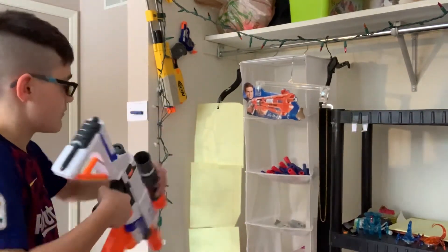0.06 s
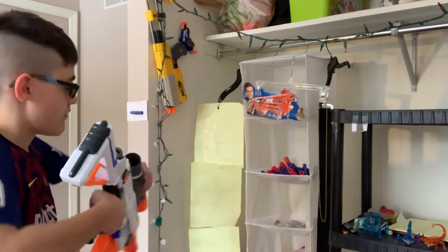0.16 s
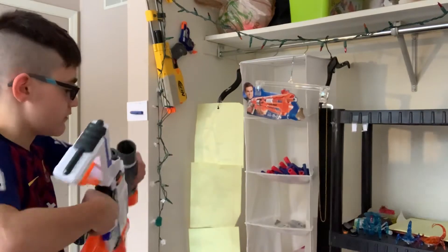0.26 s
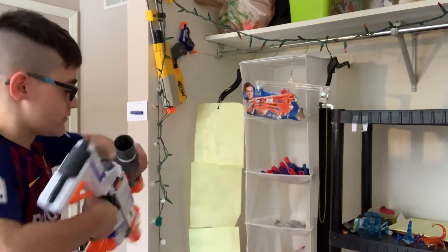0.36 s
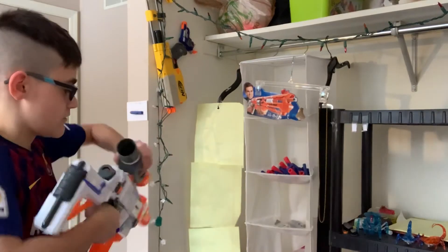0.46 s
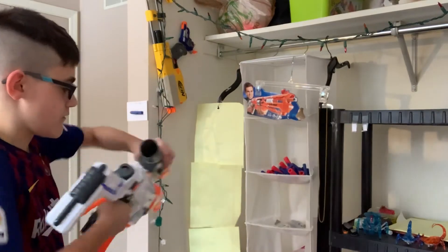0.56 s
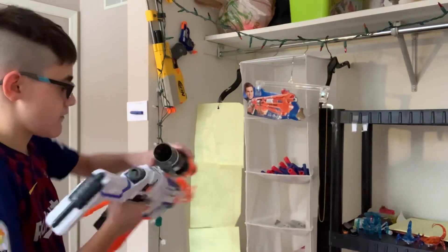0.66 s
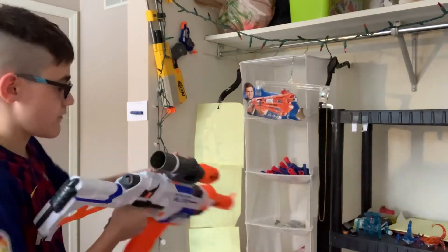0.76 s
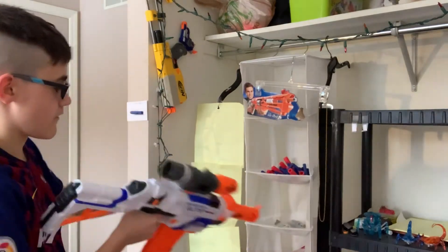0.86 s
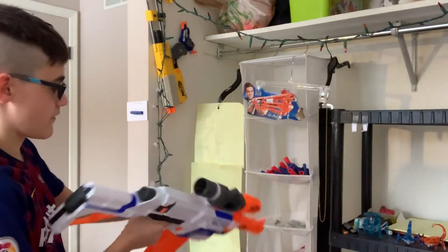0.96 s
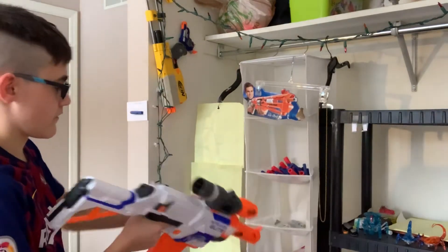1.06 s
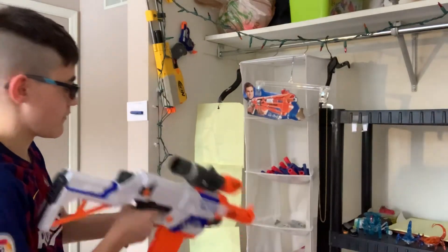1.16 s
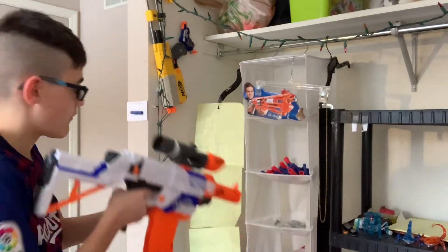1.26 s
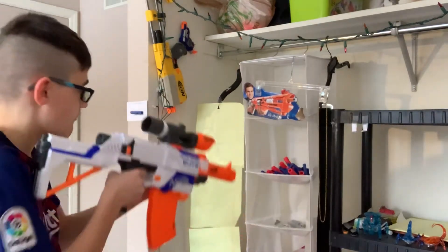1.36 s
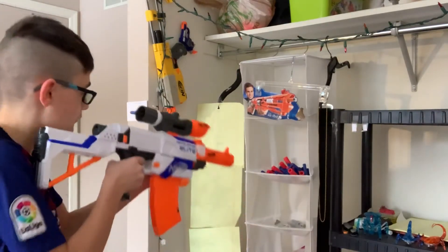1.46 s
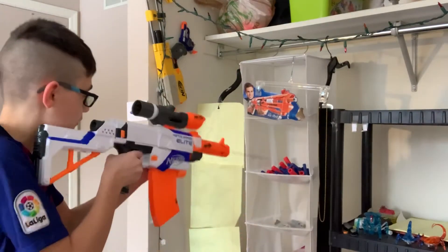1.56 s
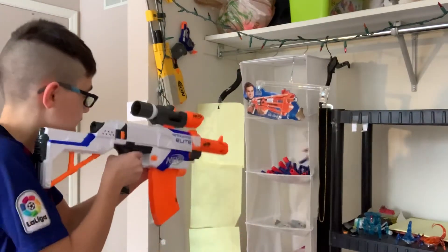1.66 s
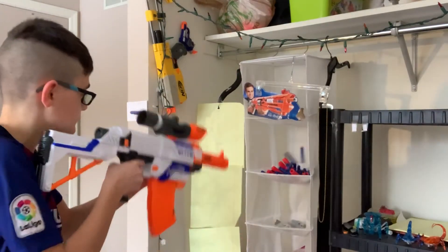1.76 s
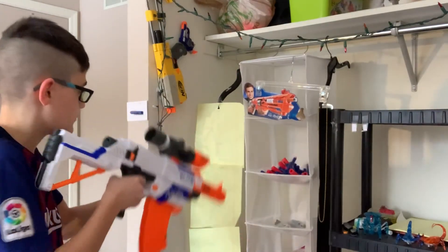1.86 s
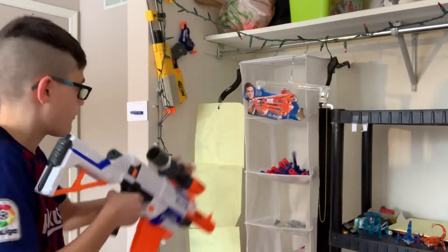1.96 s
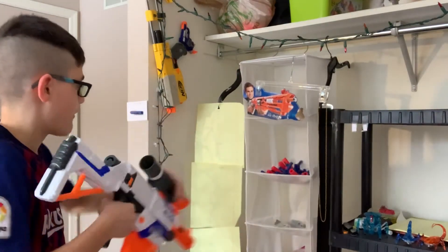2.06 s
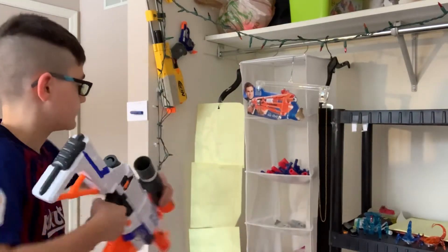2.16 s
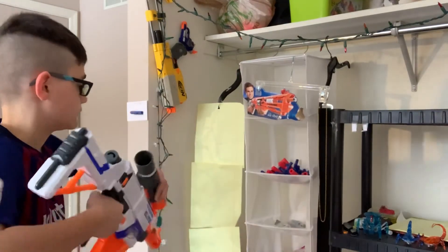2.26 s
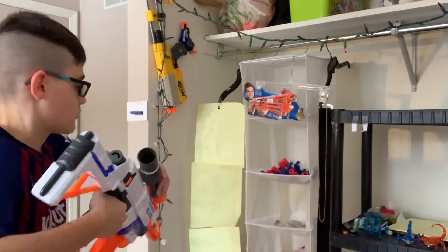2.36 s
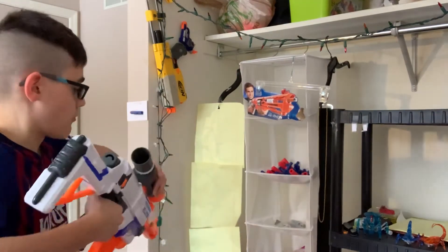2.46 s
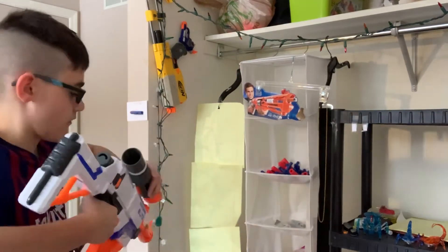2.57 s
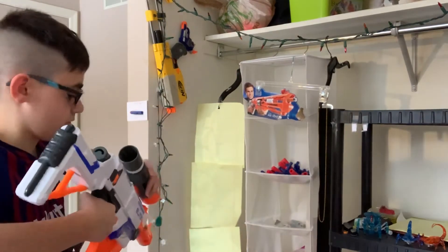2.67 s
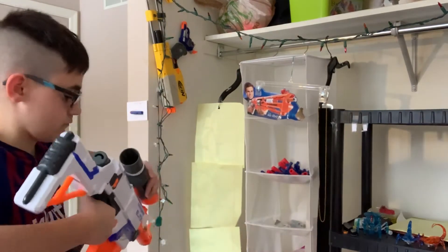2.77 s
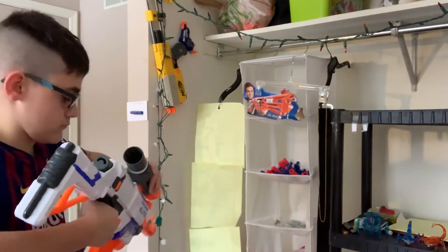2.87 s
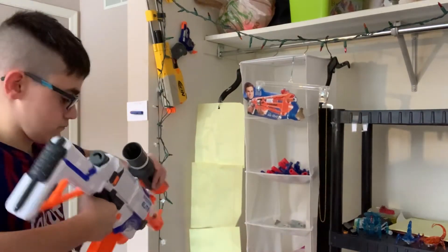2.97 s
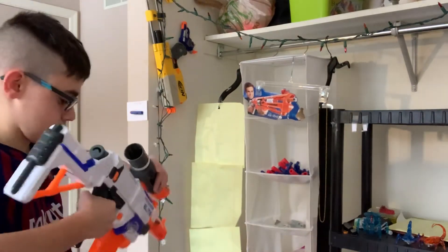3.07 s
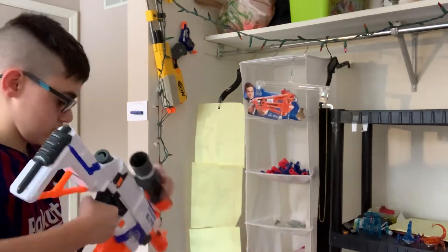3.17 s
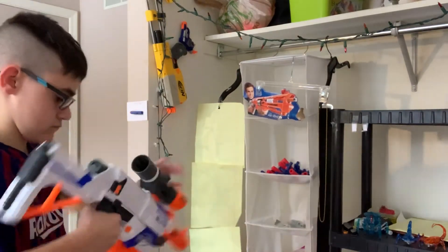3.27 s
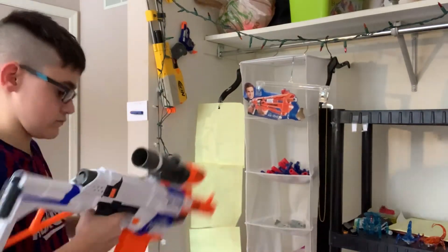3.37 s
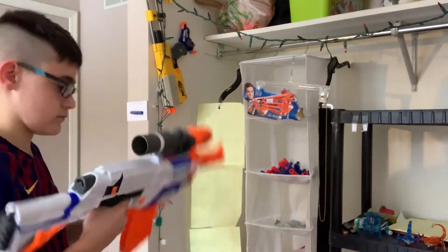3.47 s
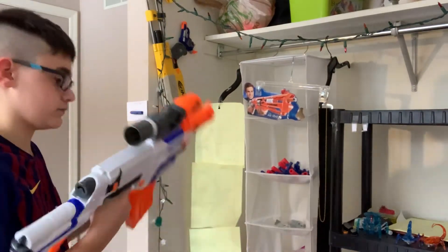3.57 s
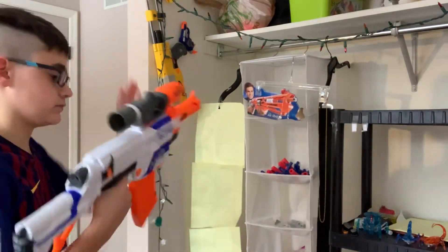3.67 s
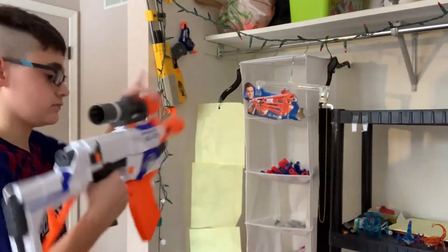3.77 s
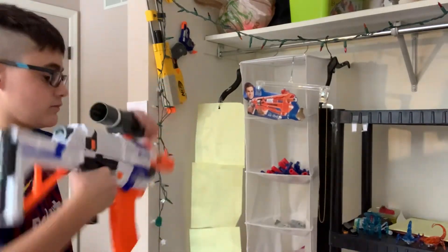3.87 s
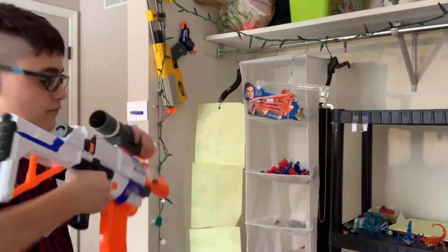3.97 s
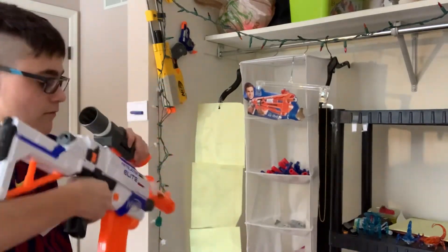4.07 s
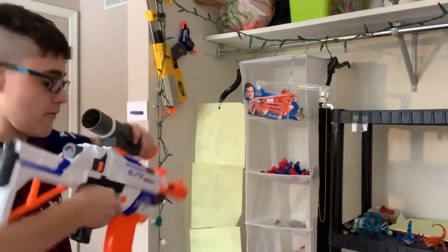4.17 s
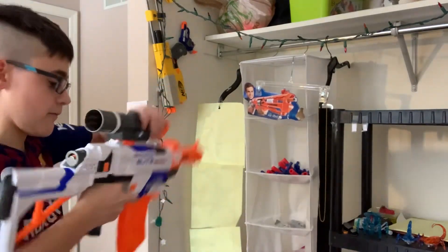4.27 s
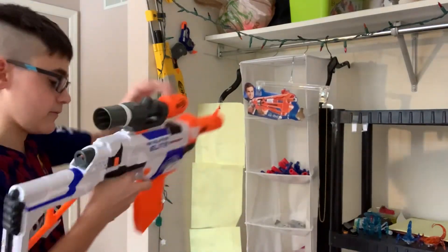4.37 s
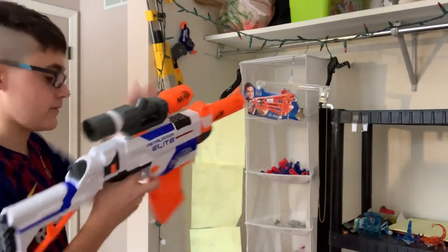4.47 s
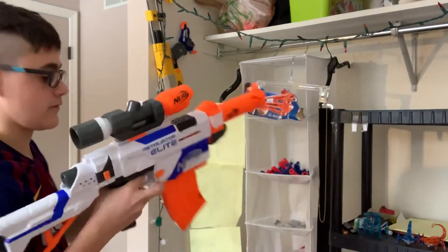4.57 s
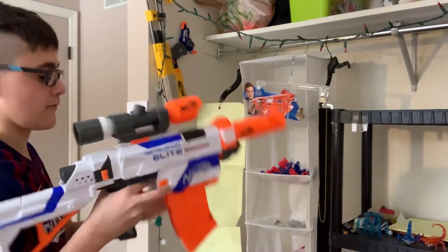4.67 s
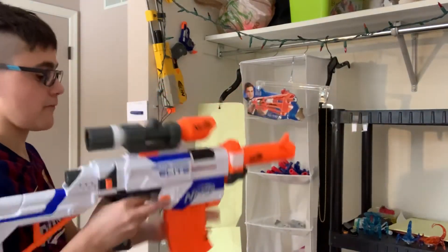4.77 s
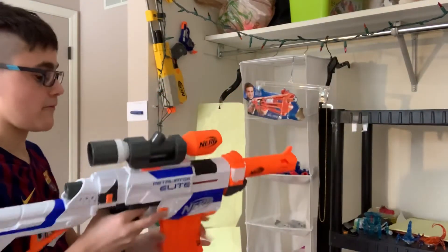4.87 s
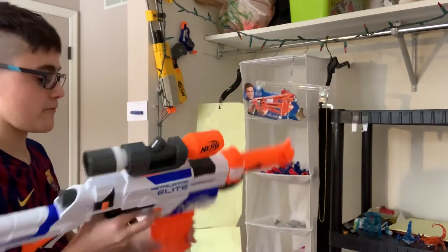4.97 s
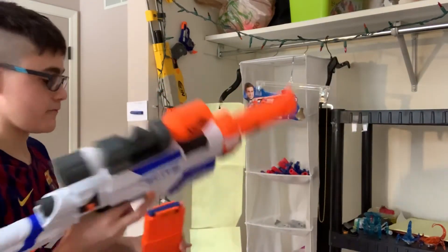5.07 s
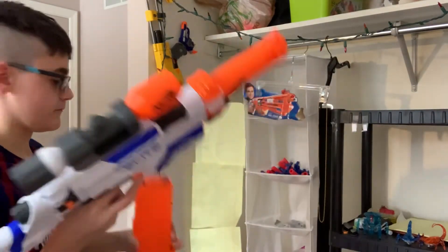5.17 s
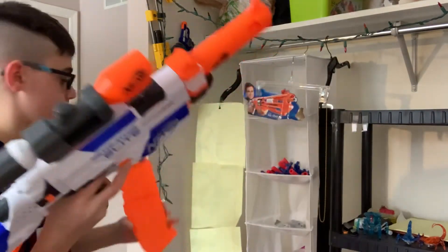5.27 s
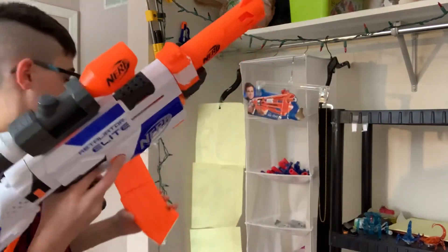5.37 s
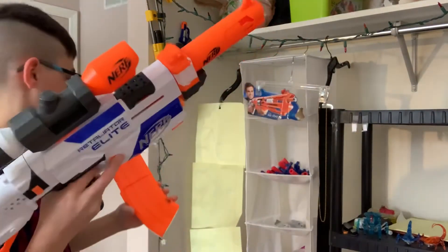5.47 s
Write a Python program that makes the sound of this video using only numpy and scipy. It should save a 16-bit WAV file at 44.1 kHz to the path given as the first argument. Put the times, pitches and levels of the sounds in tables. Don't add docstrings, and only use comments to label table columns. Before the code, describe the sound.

A plastic toy dart blaster is primed with loud rattling clacks, fired once with a hollow thump, then handled and primed again in a small room.

```python
import sys
import numpy as np
from scipy import signal
from scipy.fft import rfft, irfft
from scipy.io import wavfile
from scipy.ndimage import uniform_filter1d

SR = 44100
rng = np.random.default_rng(int(sys.argv[2]) if len(sys.argv) > 2 else 0)


def inscribe(sig):
    pcm = np.round(np.clip(np.atleast_2d(sig).T, -1, 1) * 32767)
    wavfile.write(sys.argv[1], SR, pcm.astype(np.int16))


def magnitude_from_level(level_db):
    exponent = np.asarray(level_db, float) / 20
    return 10 ** exponent


N = 243903

# centre_hz, width_hz, level_db
HOLLOW_MODES = [(270, 120, -16.5), (365, 130, -9), (431, 78, -5.5), (561, 31, -2.5), (681, 89, 0),
                (750, 200, -4)]
PANEL_MODES = [(872, 160, -6), (1210, 40, -2), (1310, 62, -0.5), (1535, 180, 3), (1700, 120, -7),
               (1613, 180, -4.5), (2119, 100, 2), (2200, 160, 5), (2240, 82, 5), (2487, 300, -0.5),
               (2689, 290, 1.5), (3090, 220, -6.5)]
RIB_MODES = [(3550, 2700, 1), (3532, 910, 6), (4500, 970, 6), (5230, 786, 7.5), (5596, 100, 3.5),
             (7117, 1100, -0.5)]
# centre_hz, width_hz, gain (near 0 dB)
EDGE_MODES = [(8000, 1500, 0.0015), (9590, 1100, 0.012), (14500, 1600, 0.0037)]


def unit(x):
    return x / np.sqrt(np.mean(np.abs(x) ** 2, axis=-1, keepdims=True) + 1e-18)


def curve(table, hz):
    f, v = np.transpose(table)
    return np.interp(np.log(hz + 1), np.log(f + 1), v)


def ring(hz, centre_hz, width_hz):
    return 1j * hz * width_hz / (centre_hz ** 2 - hz ** 2 + 1j * hz * width_hz)


def body(modes, hz, chance, spread_db, widen):
    out = 0
    for k, (centre_hz, width_hz, db) in enumerate(modes):
        strength = (-1) ** k * magnitude_from_level(db + spread_db * chance[:, k])[:, None]
        out = out + strength * ring(hz, centre_hz, width_hz * widen)
    return unit(out)


def grains(shape, share, spread_db):
    present = rng.random(shape) < share
    return present * rng.standard_normal(shape) * magnitude_from_level(spread_db * rng.exponential(size=shape))


def decay(start_s, level_db, hz, t60_s, rise_s):
    t = np.clip(np.arange(N) / SR - start_s, 0, None)
    envelope = (1 - np.exp(-t / rise_s)) * magnitude_from_level(level_db - 60 * t / t60_s)
    return envelope * np.sin(2 * np.pi * hz * t)


def contacts():
    # start_s, peak_db, hollow_db, bright_db, rattle_s
    primes = [(.142, -18.5, -22.5, -11.5, 0.015), (.183, -11, -11.5, -13, 0.0028),
              (.195, -1.5, -25, -10.5, 0.0045), (0.206, -3, -21, 2, 0.0031),
              (0.216, -14.5, -10.5, -20.5, 0.0068), (0.269, -2.5, -38, -6, 0.0026),
              (0.316, -13, -26, -14, 0.0097), (0.359, -7.5, -24, -11, 0.0056),
              (0.361, -10.5, -17.5, -16, 0.0018), (.831, -7.5, -12.5, -11.5, 0.0076),
              (0.857, -11, -31, -18.5, 0.045), (0.897, -12, -27.5, -22, 0.0021),
              (0.909, 1.5, -17, -3, 0.0041), (0.926, -4.5, -36.5, -15, 0.0062),
              (0.953, -12, -14.5, -1.5, 0.0056), (3.937, -12.5, -9, -22, 0.0046),
              (3.944, -6.5, -24, -19.5, 0.0088), (3.956, -0.5, -16.5, -2.5, 0.0074),
              (3.964, -4.5, -40.5, -14.5, 0.0046), (3.975, -11.5, -21, -21.5, 0.0096),
              (4.009, -2, -37, -7, .003), (4.056, -14, -8.5, 7, 0.014), (4.084, -2, -27, -11, .005)]
    # start_s, peak_db, bright_db, rattle_s
    shot = [
        (1.482, -30, -14.5, .01),
        (1.497, -30, -7.5, .0025),
        (1.521, -14, -19, 0.0052),
        (1.526, 4.5, -20.5, .0055),
        (1.534, -9.5, -18.5, 0.0056),
        (1.54, -19, -25, 0.0058),
        (1.568, -9, -16, 0.0032),
        (1.714, -24, -10, 0.0033),
        (1.733, -30, -20, 0.0027),
        (1.775, -37, -16, 0.0047),
    ]
    # start_s, peak_db, hollow_db, bright_db, ring_hz
    catches = [(0.029, -31.5, -14.5, -19, 2380), (0.123, -36.5, -23, 1, 1750),
               (0.493, -24, -20, 13.5, 4260), (1.914, -32, -11, -16.5, 2240),
               (2.137, -41.5, -20.5, -13, 2280), (2.164, -19, -12.5, -16, 1680),
               (2.228, -31, -12.5, -15, 578), (3.065, -27, -18, -17, 1693), (3.076, -17, -18, -13.5, 1645),
               (3.717, -22.5, -14, -7, 2270), (3.747, -20.5, -13, -13.5, 2240), (3.869, -37, -11, 3, 1430),
               (3.912, -34, 0, 3.5, 1570), (4.205, -21, -15.5, -7.5, 2040), (4.237, -26, -12, -2, 633),
               (4.313, -31, -20, -18.5, 2120), (4.611, -37.5, -13, -14, 1274),
               (4.689, -20, -27, -12.5, 2600), (4.789, -21, -35, -19, 4700),
               (4.903, -12, -18.5, -20.5, 1166), (4.913, -24.5, -16, -22, 1190),
               (4.955, -23, -7.5, -28, 1010), (4.973, -15, -22.5, -15.5, 993), (4.987, -26, 3.5, -1.5, 724)]
    # start_s, peak_db
    grip = [(.591, -33.5), (0.603, -33.5), (0.636, -33.5), (0.803, -38), (1.122, -40.5), (1.154, -35),
            (1.199, -46), (1.266, -36.5), (1.302, -41), (1.372, -38.5), (1.438, -37.5), (3.37, -51.5),
            (3.386, -42), (3.462, -50), (3.523, -45), (4.389, -59.5), (4.568, -49), (5.177, -46.5),
            (5.2, -47.5), (5.221, -40), (5.295, -40), (5.365, -43.5)]
    # start_s, peak_db, hollow_db
    breech = [(2.041, -40.5, -1.5), (2.111, -52, -13), (2.082, -61, -5), (2.336, -32, -15.5),
              (2.387, -33, -21.5), (2.448, -32.5, -10), (2.479, -43.5, 9), (2.512, -35.5, -26),
              (2.554, -42.5, -32), (2.59, -40, -20), (2.657, -37, -7.5), (2.745, -43.5, -2),
              (2.789, -54, -2), (2.822, -52.5, 0), (2.849, -49, -27), (2.914, -38, 13),
              (2.967, -42.5, -4.5), (2.98, -38.5, -27), (3.013, -36, -17), (3.038, -34, -9)]

    rows = [(s, db, hollow, bright, 0, rattle_s) for s, db, hollow, bright, rattle_s in primes]
    rows += [(s, db, -17.5, bright, 0, rattle_s) for s, db, bright, rattle_s in shot]
    rows += [(*row, 0.006) for row in catches]
    rows += [(s, db, -19.5, -21.5, 0, 0.0087) for s, db in grip]
    rows += [(s, db, hollow, -17, 0, 0.0064) for s, db, hollow in breech]
    rows = np.array(rows)
    spot_hz = 1524 * np.exp(0.12 * rng.standard_normal(len(rows)))
    rows[:, 4] = np.where(rows[:, 4] > 0, rows[:, 4], spot_hz)
    driven = np.arange(len(rows)) < len(primes) + len(shot)
    return rows, driven[:, None]


def clacks():
    frame, knock_at_s = 8192, 0.03
    rows, driven = contacts()
    start_s, peak_db, hollow_db, bright_db, ring_hz, rattle_s = rows.T[:, :, None]
    count = len(rows)
    t = np.arange(frame) / SR - knock_at_s
    hz = np.fft.rfftfreq(frame, 1 / SR)
    rattle_s = np.clip(rattle_s, 0.001, 0.04)
    after = np.clip(t, 0, None)

    rise_s = np.where(driven, 0.0066, 0.0014)
    slide_in = magnitude_from_level(np.where(driven, -18, -21.5)) * np.exp(-np.abs(t) / 0.0062)
    ticks = grains((count, frame), share=0.3, spread_db=3)
    chatter_env = (1 - np.exp(-after / rise_s)) * np.exp(-after / rattle_s)
    chatter = rfft(ticks * (slide_in + chatter_env))
    crack_env = (1 - np.exp(-after / (0.4 * rise_s))) * np.exp(-after / (0.65 * rattle_s))
    crack = rfft(ticks * (0.4 * slide_in + crack_env))

    chance = rng.standard_normal((count, 4, 30))
    colour = body(PANEL_MODES, hz, chance[:, 0], spread_db=2.5, widen=2.4)
    colour += magnitude_from_level(hollow_db + 11) * body(HOLLOW_MODES, hz, chance[:, 1], spread_db=3, widen=1.8)
    colour += magnitude_from_level(bright_db + 12) * body(RIB_MODES, hz, chance[:, 2], spread_db=2.5, widen=1.9)
    colour += magnitude_from_level(-8) * unit(ring(hz, ring_hz, ring_hz / 8))
    edge_db = bright_db + 0.4 * peak_db + np.where(driven, 9, 2)
    edge = magnitude_from_level(edge_db) * body(EDGE_MODES, hz, chance[:, 3], spread_db=3, widen=1.1)

    knocks = irfft(unit(chatter) * colour + unit(crack) * edge, frame)
    knocks *= magnitude_from_level(peak_db - 2) / np.abs(knocks).max(axis=1, keepdims=True)
    out = np.zeros(N + 2 * frame)
    starts = ((start_s[:, 0] - knock_at_s) * SR).astype(int) + frame
    for start, knock in zip(starts, knocks):
        out[start:start + frame] += knock
    return out[frame:frame + N]


def slam():
    # start_s, level_db
    blow = (1.529, -16.5)
    # hz, level_db, t60_s
    tube = [(56.1, -15, 0.2), (76, -13.5, 0.21), (99, -17, 0.47), (172, -4.5, 0.049), (217, 3.5, 0.078),
            (322, -9.5, .07), (1070, -1, 0.06), (1280, 3, .05), (1507, 3, 0.17), (1607, 1, 0.082),
            (2580, -1.5, .03)]
    start_s, level_db = blow
    return sum(decay(start_s, level_db + db, hz, t60_s, rise_s=0.0015) for hz, db, t60_s in tube)


def pings():
    # start_s, level_db, pitch_hz, t60_s
    parts = [(.205, -23.5, 554.6, 0.19), (.268, -13, 4290, 0.048), (.361, -21.5, 659, 0.089),
             (0.838, -13, 1656, 0.048), (1.84, -60.5, 1069, 0.47), (2.172, -38, 560, 0.082),
             (3.08, -41, 586, 0.18), (3.37, -63, 1544, 0.78), (4.014, -11.5, 4390, 0.033),
             (4.689, -27, 2664, 0.042), (4.691, -23.5, 2090, 0.02), (4.791, -29, 4660, 0.064),
             (4.904, -27, 1100, 0.045), (4.975, -30, 2200, 0.065), (4.978, -22, 684, 0.061)]
    return sum(decay(*part, rise_s=0.00097) for part in parts)


def snaps():
    # start_s, peak_db
    sharpest = [(.1436, -44), (.3591, -29.5), (.4973, -51), (.9093, -30), (1.5214, -50), (2.1653, -64),
                (3.0778, -29), (3.7494, -44.5), (3.8686, -46), (4.0098, -23), (4.202, -58.5), (4.2358, -49),
                (4.9023, -51), (4.9726, -38)]
    t = np.arange(N) / SR
    gate = sum(magnitude_from_level(db + 3) * np.exp(-((t - s - 0.004) / 0.0034) ** 2) for s, db in sharpest)
    band = signal.butter(3, [7600, 15500], "band", fs=SR, output="sos")
    return gate * signal.sosfilt(band, rng.standard_normal((2, N)))


def rub():
    # time_s, level_db
    hand_levels = [(0, -52), (.5, -49), (.76, -64.5), (1.2, -65.5), (1.42, -66), (1.66, -46), (1.88, -63.5),
                   (2.37, -58.5), (2.76, -63), (3.5, -64.5), (3.66, -78), (3.8, -56.5), (4.17, -44.5),
                   (4.39, -56), (4.55, -79), (4.9, -49.5), (5.24, -65.5), (5.5, -86)]
    # middle_s, level_db, half_length_s
    rail_slides = [
        (0.333, -32.5, 0.024),
        (0.649, -49, 0.036),
        (.88, -41, .03),
        (1.603, -37, 0.024),
        (3.915, -48.5, 0.023),
        (4.064, -28, 0.036),
        (2.155, -46.5, 0.0093),
        (4.119, -50.5, 0.045),
        (4.812, -48.5, .03),
        (4.936, -45.5, 0.032),
    ]
    t = np.arange(N) / SR
    hz = np.fft.rfftfreq(N, 1 / SR)
    hands = magnitude_from_level(np.interp(t, *np.transpose(hand_levels)))
    slides = sum(magnitude_from_level(db) * np.exp(-((t - s) / half_s) ** 2) for s, db, half_s in rail_slides)
    spurts = np.repeat(rng.standard_normal(N // 400 + 1), 400)[:N]
    spurts = uniform_filter1d(spurts, size=200)
    ticks = rfft(grains(N, share=0.08, spread_db=1.8) * magnitude_from_level(4.5 * spurts))
    touch = rng.standard_normal((1, 30))

    def scrape(modes):
        return unit(irfft(ticks * body(modes, hz, touch, spread_db=2, widen=6.3)[0], N))

    breech_open = (t > 1.7) & (t < 3.3)
    hollow = magnitude_from_level(-1 + 5.5 * breech_open) * scrape(HOLLOW_MODES)
    dull = (hands + slides) * (scrape(PANEL_MODES) + hollow)
    bright = magnitude_from_level(-26.5) * hands + magnitude_from_level(-4.5) * slides
    return magnitude_from_level(-8) * (dull + bright * (scrape(RIB_MODES) + magnitude_from_level(-19) * scrape(EDGE_MODES)))


def room(x):
    # hz, t60_s
    room_t60 = [(100, 0.58), (400, 0.43), (1500, 0.3), (5000, 0.32), (12000, 0.2)]
    t = np.arange(SR) / SR
    hz = np.fft.rfftfreq(SR, 1 / SR)
    noise = rfft(rng.standard_normal((2, SR)))
    tail = 0
    for centre_hz in 62.5 * 2 ** np.arange(9):
        octave = np.clip(1 - np.abs(np.log2((hz + 1) / centre_hz)), 0, 1)
        tail = tail + irfft(noise * octave, SR) * magnitude_from_level(-60 * t / curve(room_t60, centre_hz))
    early = magnitude_from_level(11.5) * rng.standard_normal((2, SR)) * np.exp(-t / 0.0097)
    tail = (tail + early) * (1 - np.exp(-t / 0.0065))
    return signal.fftconvolve(x[None], magnitude_from_level(-2) * unit(tail) / np.sqrt(SR), axes=1)[:, :N]


def house(work):
    # hz, level_db (per Hz)
    rumble_spectrum = [(20, -14.5), (45, -2.5), (100, -3), (140, -19), (200, -18.5), (400, -20.5),
                       (1000, -39.5), (3000, -60.5), (20000, -90.5)]
    hz = np.fft.rfftfreq(N, 1 / SR)
    rumble = unit(irfft(rfft(rng.standard_normal((2, N))) * magnitude_from_level(curve(rumble_spectrum, hz)), N))
    lag_s = 0.067
    keep = np.exp(-1 / (lag_s * SR))
    busy = uniform_filter1d(signal.lfilter([1 - keep], [1, -keep], np.abs(work)), size=8000)
    swell = magnitude_from_level(-68.5) * (1 + busy / magnitude_from_level(-68)) ** 0.15
    footstep = magnitude_from_level(-55) * np.exp(-(np.arange(N) / SR / 0.25) ** 2)
    return (swell + footstep) * rumble


def scene():
    # hz, left_lead_rad
    port_lead = [(0, 0), (520, -1.0), (1120, -.7), (1640, .8), (3450, -.2), (4400, .8), (5250, 2.3),
                 (6370, 1.3), (7300, 2.6), (7900, np.pi), (10100, np.pi), (11300, 4.5), (12400, 2 * np.pi),
                 (22050, 2 * np.pi)]
    # hz, echo_likeness (0-1)
    echo_likeness = [(60, .97), (130, .9), (250, .3), (600, 0), (4500, 0), (6500, .5), (7900, 1),
                     (16000, 1)]
    # hz, right_minus_left_db
    port_balance = [(60, 2.5), (250, 1), (1000, 2.5), (4000, 1), (8000, 1.5), (20000, 2)]
    # hz, level_db
    top_fall = [(11000, -0.5), (13000, -3), (16000, -9.5)]
    rattle = clacks() + rub()
    rings = slam() + pings()
    direct_sound = rattle + rings
    echoes = room(rattle + magnitude_from_level(-9) * rings) + house(direct_sound)
    hz = np.fft.rfftfreq(N, 1 / SR)
    like = curve(echo_likeness, hz)
    direct = rfft(direct_sound)
    one, other = rfft(echoes)
    turn = np.exp(0.5j * np.interp(hz, *np.transpose(port_lead))) * magnitude_from_level(-curve(port_balance, hz) / 2)
    left = (direct + one) * turn
    right = (direct + like * one + np.sqrt(1 - like ** 2) * other) / turn
    return irfft(np.array([left, right]) * magnitude_from_level(curve(top_fall, hz)), N) + snaps()


def band_limit(x):
    return signal.sosfilt(signal.butter(12, 16810, fs=SR, output="sos"), x)


def record(dry):
    x = signal.sosfilt(signal.butter(4, 42, "high", fs=SR, output="sos"), dry)
    x = signal.sosfilt(signal.ellip(8, 0.2, 60, 15700, fs=SR, output="sos"), x)
    return band_limit(x)


dry = scene()
out = record(dry)
inscribe(out)
```